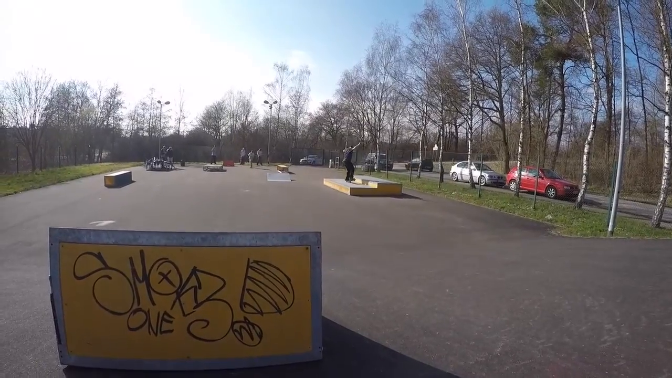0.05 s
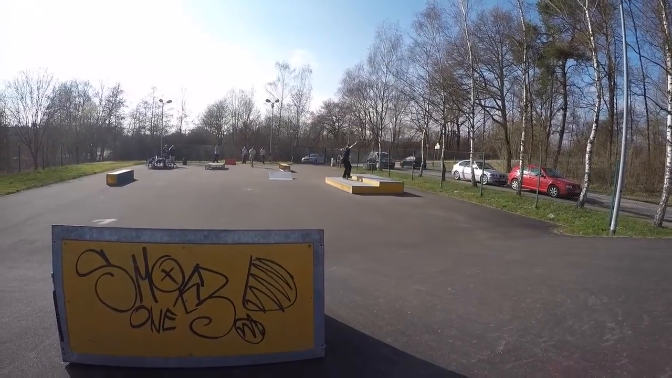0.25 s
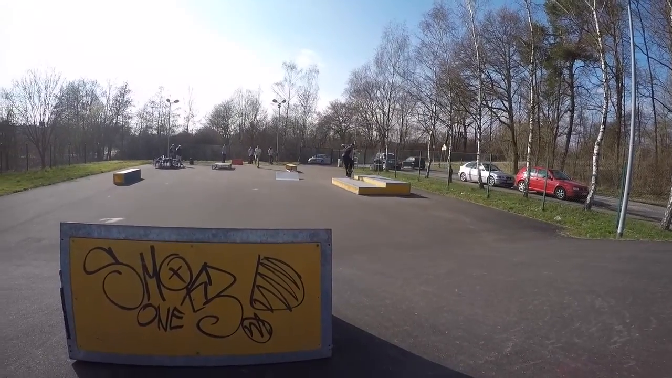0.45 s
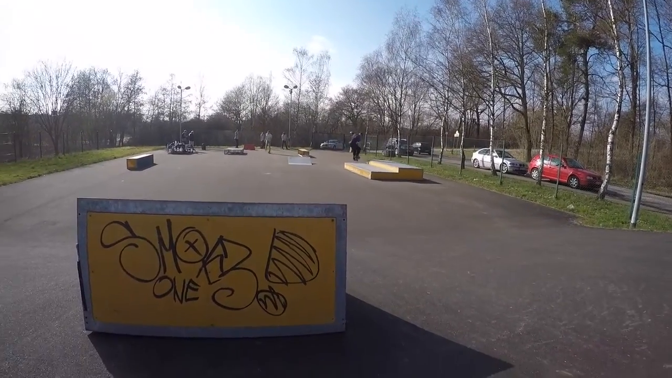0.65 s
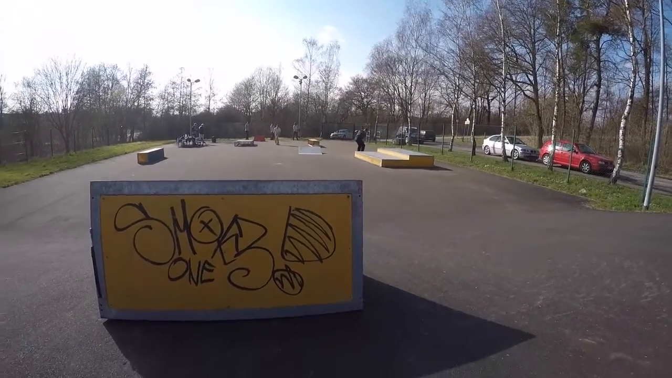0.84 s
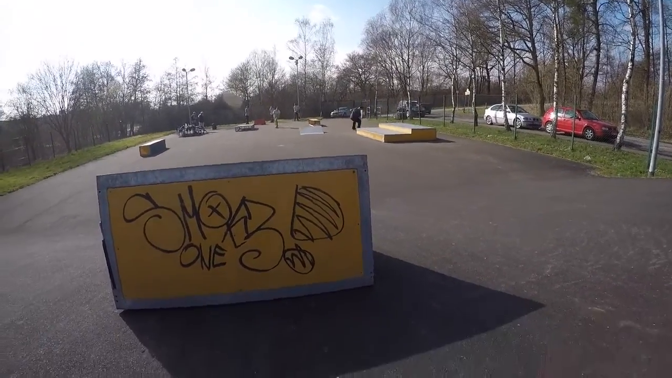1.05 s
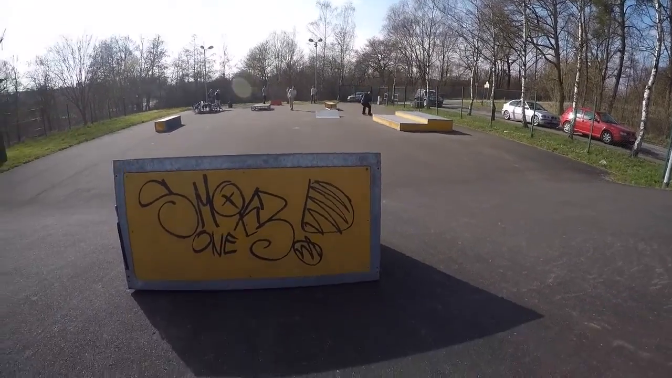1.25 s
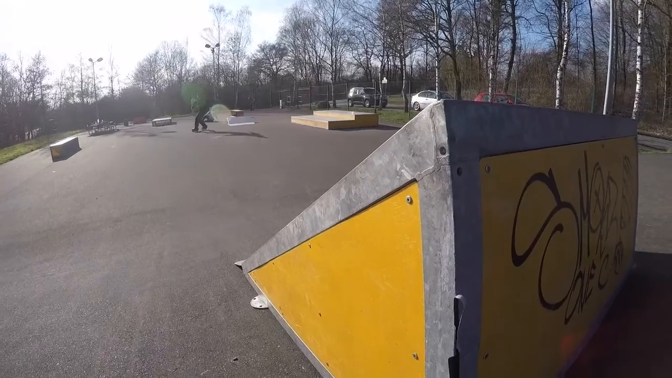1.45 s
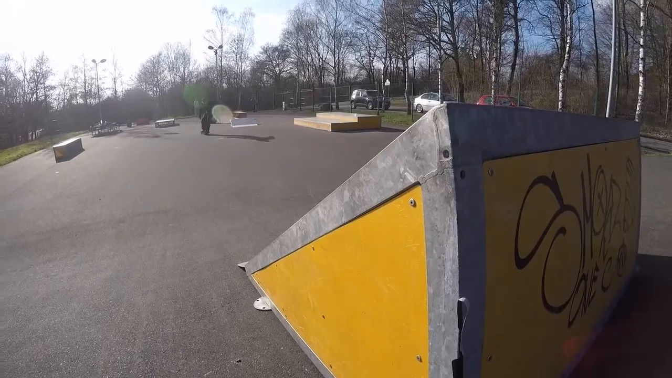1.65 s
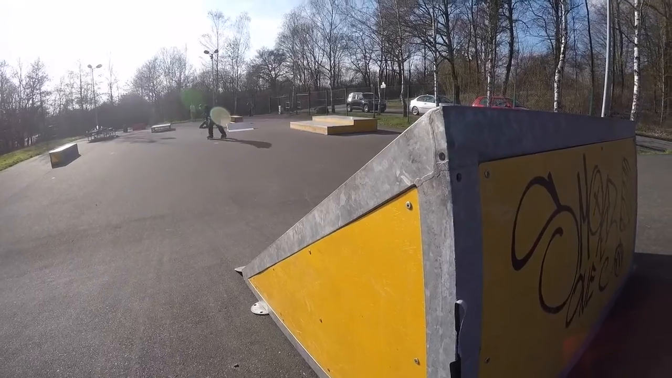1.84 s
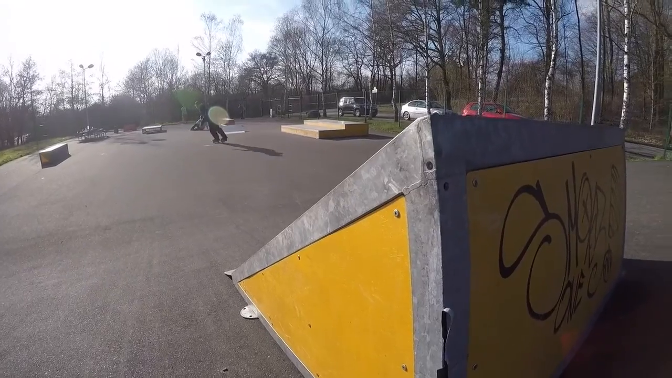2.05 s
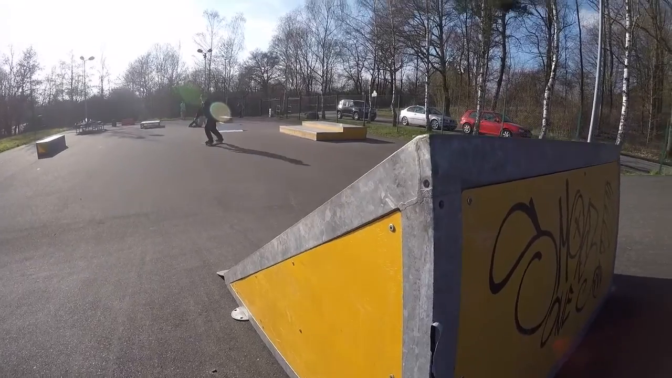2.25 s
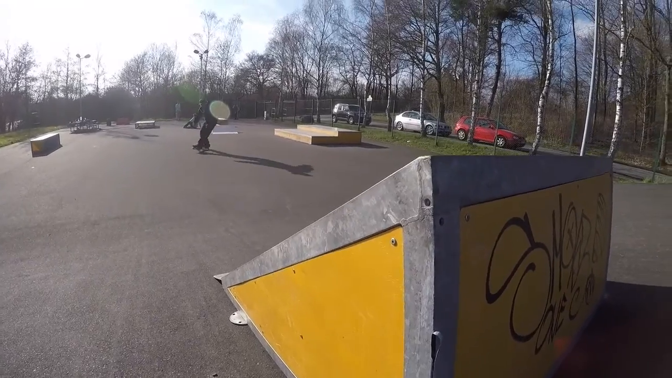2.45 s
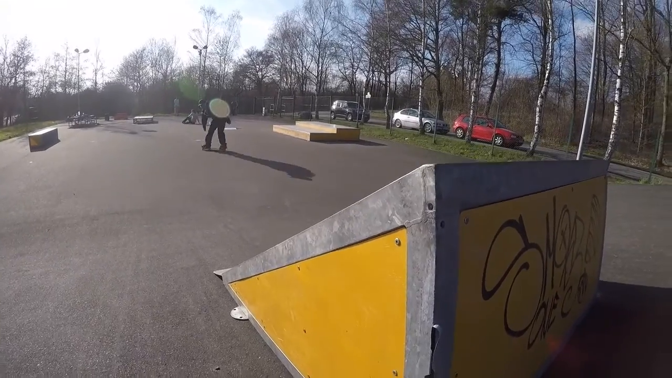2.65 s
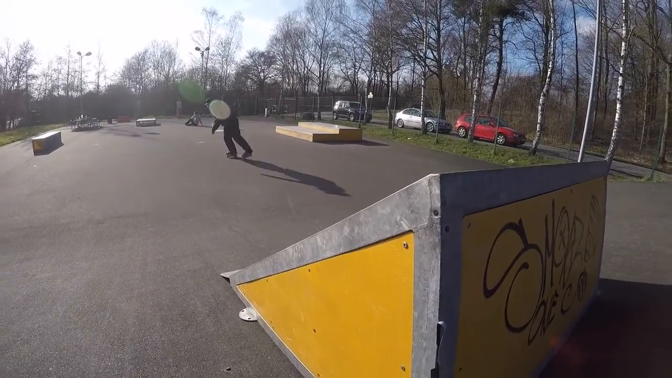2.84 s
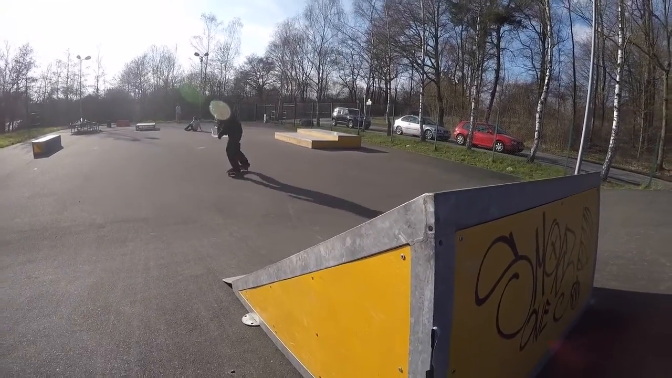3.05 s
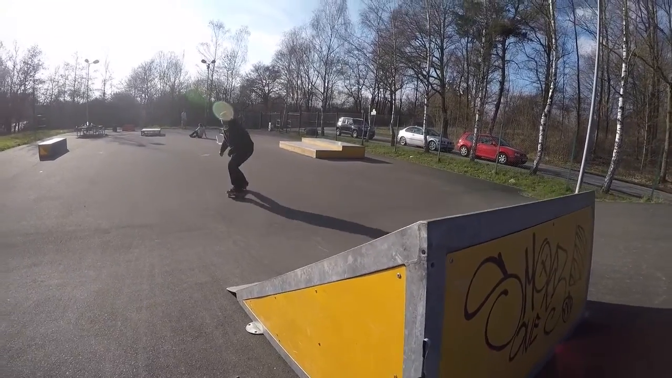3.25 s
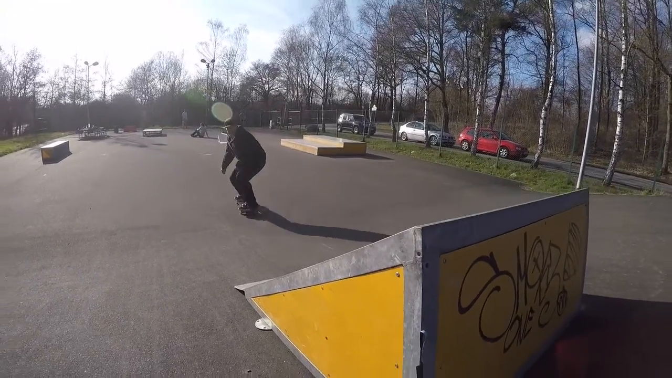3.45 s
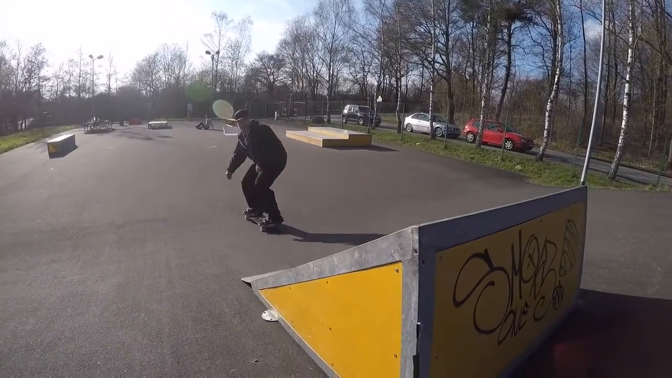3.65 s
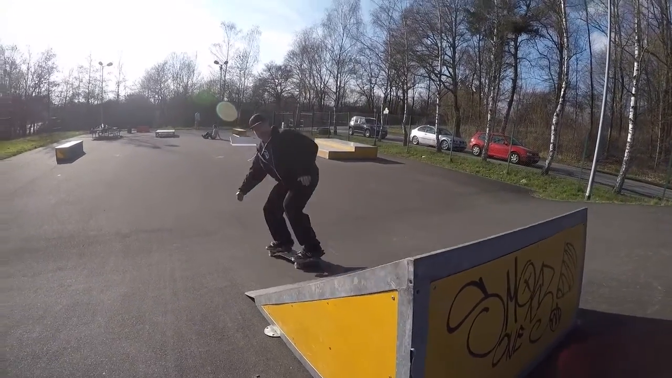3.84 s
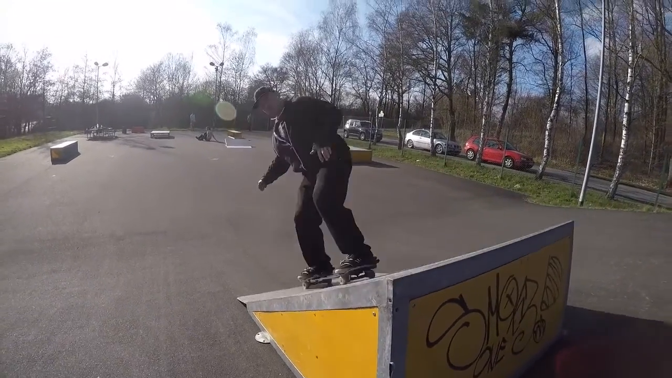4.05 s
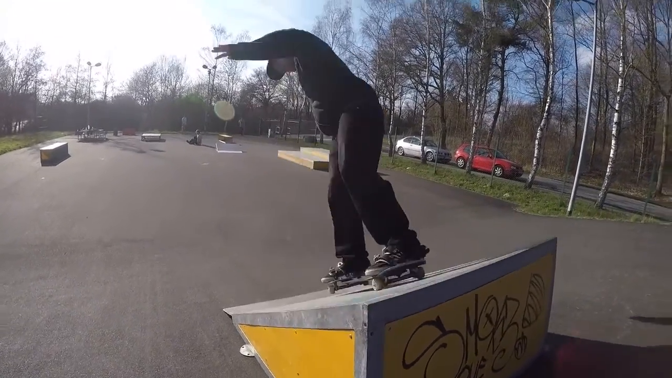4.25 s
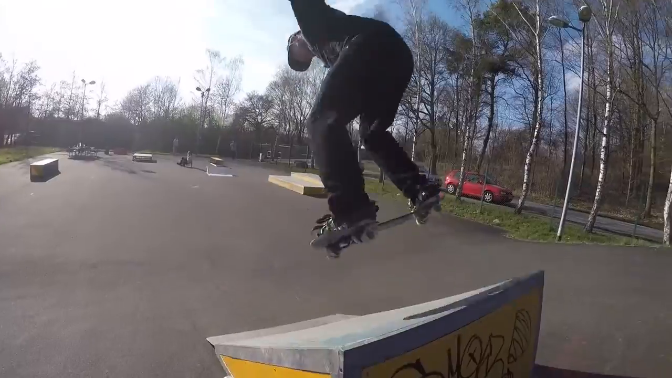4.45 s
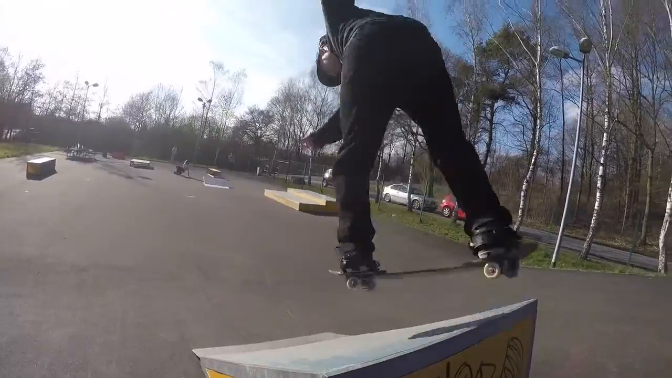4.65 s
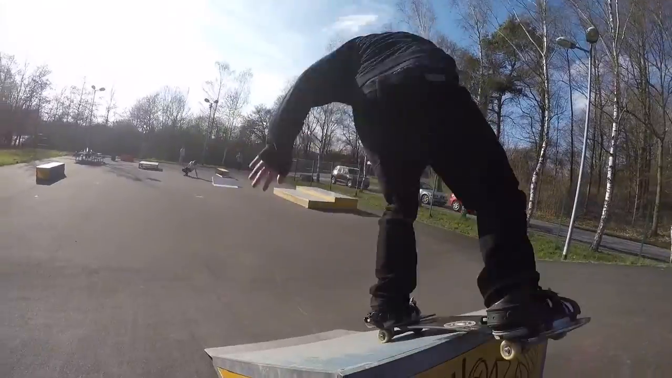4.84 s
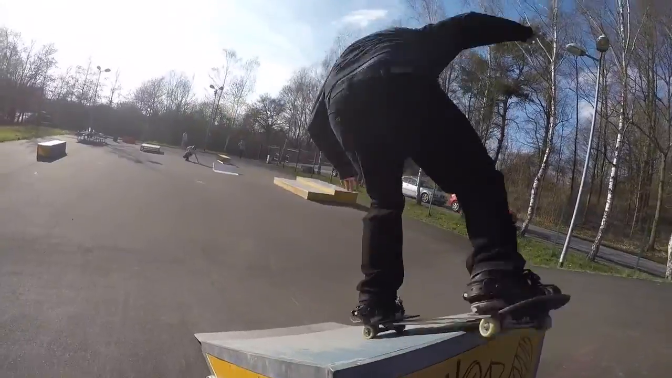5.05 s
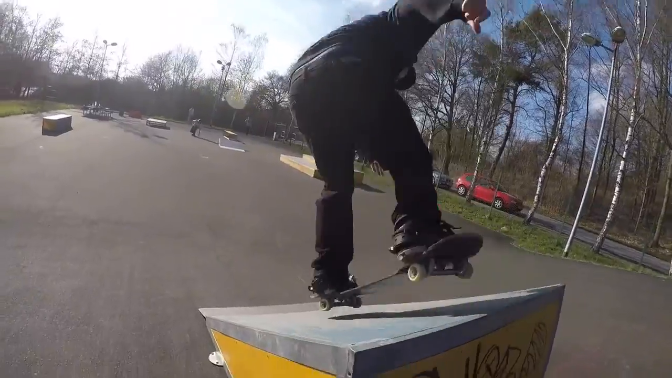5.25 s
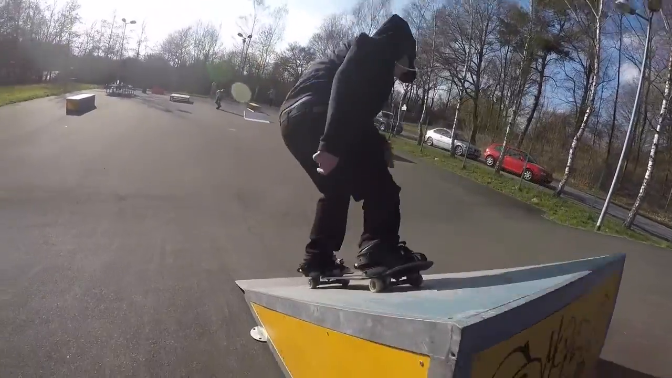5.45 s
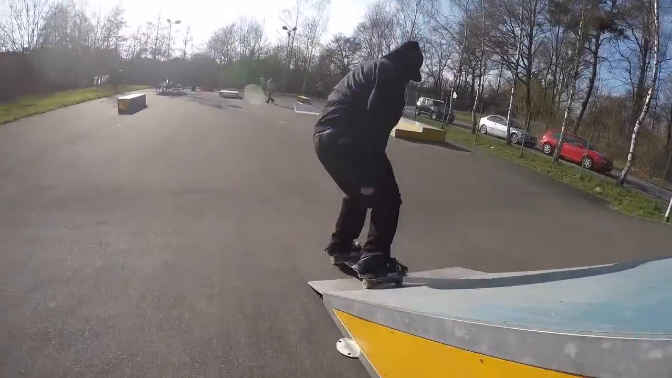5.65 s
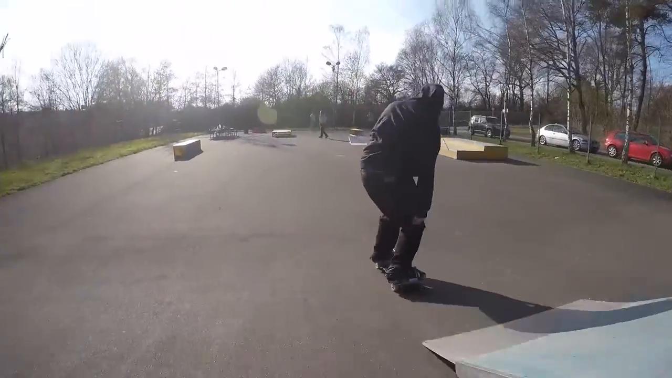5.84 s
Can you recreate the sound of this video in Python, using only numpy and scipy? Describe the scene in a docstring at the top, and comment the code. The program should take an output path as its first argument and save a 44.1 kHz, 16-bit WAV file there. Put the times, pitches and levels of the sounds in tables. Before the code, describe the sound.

A skateboard rolls closer over rough asphalt, slams onto a hollow steel-edged ramp, pauses, bangs twice more, and rumbles away.

```python
"""At a hollow steel-edged ramp, a skateboard rolls up over rough asphalt, slams on, stalls, drops back and rolls off.
Random grit excites resonances of wheels and wooden deck, also in the slams' fading tails; stones tick as noise bursts.
Slams and slower swells of clatter are decaying noise with ringing steel, deck and air modes.
A far board scrapes (noise bands gliding upward) and pops (struck modes); far boards make a smooth wash.
Lumpy low noise is wind on the microphone, at the end the board's low rumble; single pressure puffs join it."""
import sys
import numpy as np
from scipy import signal
from scipy.io import wavfile

SR = 44100
rng = np.random.default_rng(int(sys.argv[2]) if len(sys.argv) > 2 else 0)


def dump(signal):
    """Clip the signal to [-1, 1] and save it as 16-bit WAV at the path in sys.argv[1]."""
    limited = np.clip(np.atleast_2d(signal).T, -1, 1)
    pcm = np.round(limited * 32767).astype(np.int16)
    wavfile.write(sys.argv[1], SR, pcm)


N = 260631


def from_db(db):
    """Amplitude gain is ten to the power of a twentieth of the level in decibels."""
    return 10 ** (np.asarray(db) / 20)


def rms_one(x):
    """Normalization: dividing by the root mean square brings the signal to rms 1."""
    return x / np.sqrt(np.mean(x ** 2) + 1e-20)


def in_time(rows):
    """Linear interpolation turns the breakpoints of each column into a curve over all samples."""
    s, *columns = np.transpose(rows)
    return [np.interp(np.arange(N) / SR, s, column) for column in columns]


def at_hz(points, hz):
    """Interpolation on a log-frequency axis reads a spectrum between its points."""
    frequencies, values = np.transpose(points)
    return np.interp(np.log(hz), np.log(frequencies), values)


def drift(rate_hz):
    """Low-passed noise of rms 1: a random fluctuation, computed at every 40th sample."""
    r = np.exp(-2 * np.pi * rate_hz * 40 / SR)
    noise = rng.standard_normal(N // 40 + 2002)
    slow = signal.lfilter([1], [1, -2 * r, r * r], noise)[2000:]   # without the filter's onset
    return np.interp(np.arange(N) / 40, np.arange(len(slow)), rms_one(slow))


def ring(x, hz, t60):
    """Free vibration: a unit click starts a sine of height 1 that falls 60 dB in t60 seconds."""
    r = from_db(-60 / (t60 * SR))
    w = 2 * np.pi * hz / SR
    return signal.lfilter([0, np.sin(w)], [1, -2 * r * np.cos(w), r * r], x + 1e-18)


def resonate(x, hz, width_hz):
    """Forced vibration: a damped two-pole resonance passes its own frequency with gain 1."""
    r = np.exp(-np.pi * width_hz / SR)
    poles = [1, -2 * r * np.cos(2 * np.pi * hz / SR), r * r]
    return signal.lfilter([(1 - r * r) / 2, 0, (r * r - 1) / 2], poles, x)


def resonances(x, modes, waver_db):
    """Modal superposition: parallel resonances of alternating sign, each wavering in level; rms 1."""
    total = 0
    for k, (hz, width_hz, db) in enumerate(modes):
        gain = (-1) ** k * from_db(db + waver_db * drift(3.7))
        total = total + gain * resonate(x, hz, width_hz)
    return rms_one(total)


def steep(x, hz, kind):
    """Fourth-order Butterworth filter: flat passband, then 24 dB per octave."""
    return signal.sosfilt(signal.butter(4, hz, kind, fs=SR, output="sos"), x)


def bands(low_hz, count):
    """Third-octave bands of noise with equal power per Hz, each with its centre frequency."""
    white = rng.standard_normal((2, N))   # neighbouring bands use different noise
    edges = low_hz * 2 ** (np.arange(count + 1) / 3)
    for k in range(count):
        sos = signal.butter(2, edges[k:k + 2], "band", fs=SR, output="sos")
        yield np.sqrt(edges[k] * edges[k + 1]), signal.sosfilt(sos, white[k % 2])


def grit(per_s, spread_db):
    """Random impulse train: stones of uneven size and either sign pass under the wheels."""
    sizes = from_db(spread_db * np.minimum(rng.exponential(1, N), 5)) * rng.choice([-1, 1], N)
    return sizes * (rng.random(N) < per_s / SR)


def dying(at_s, level_db, t60, rise_s):
    """Exponential decay after a linear rise; overlapping events add in power."""
    power = np.zeros(N)
    for s, db, t, rise in np.broadcast(at_s, level_db, t60, rise_s):
        i = round(s * SR)
        age = np.arange(min(N - i, int((1.5 * t + rise) * SR))) / SR
        decay = from_db(db - 60 * np.maximum(age - rise, 0) / t)
        power[i:i + len(age)] += (np.minimum(age / rise, 1) * decay) ** 2
    return np.sqrt(power)


def struck(modes, at_s, level_db, soft_hz):
    """Modal impact: each click gives every mode a strength of its own; soft contact dulls the treble."""
    out = np.zeros(N)
    at = np.round(at_s * SR).astype(int)
    spread = rng.standard_normal((len(at), len(modes)))
    for k, (hz, db, t60) in enumerate(modes):
        clicks = np.zeros(N)
        clicks[at] = from_db(level_db + db + 2 * spread[:, k]) * (-1) ** k
        out += ring(clicks, hz, t60)
    return signal.sosfilt(signal.butter(1, soft_hz, fs=SR, output="sos"), out)


def low_noise():
    """Band-shaped random noise: lumpy wind, at the end the board's low rumble, and single pressure puffs."""
    # Level of low noise: wind gusts, and from 5.6 s the low rumble of the board rolling off.
    # Each row: time in seconds, level in dB.
    low_course = [(0.0, -30.5), (0.26, -33), (0.64, -30), (0.91, -30), (1.07, -34.5), (1.33, -30.5),
                  (1.46, -23.5), (1.71, -24.5), (1.92, -19), (2.26, -28), (2.81, -26.5), (2.96, -31.5),
                  (3.21, -24), (3.36, -26.5), (3.77, -18.5), (4.1, -13), (4.36, -24), (4.72, -23.5),
                  (4.89, -26.5), (5.3, -27), (5.48, -40.5), (5.68, -17), (5.84, -27), (5.91, -22)]
    # Spectrum of the low noise. Each row: frequency in Hz, relative density in dB per Hz.
    low_spectrum = [(8.8, -31), (15, -8), (32, 1), (49, -3), (73, -8.5), (157, -26.5), (199, -32),
                    (400, -31), (520, -51), (880, -120)]
    # Pressure puffs on the microphone. Each row: centre in seconds, peak level in dB, length in seconds.
    puffs = [(1.342, -20.5, 0.0055), (1.732, -5.5, 0.0085), (3.45, -8, 0.0052), (3.749, -5, 0.012),
             (4.738, -4.5, 0.0089), (5.293, -9, 0.0061)]
    lumps_db, lumps_hz = 2.5, 11   # spread and rate of the lumps

    noise = sum(from_db(at_hz(low_spectrum, hz) + 2.3 * drift(3.16)) * band
                for hz, band in bands(16.04, count=13))
    out = from_db(in_time(low_course)[0] + lumps_db * drift(lumps_hz)) * rms_one(noise)
    t = np.arange(N) / SR
    for s, db, length in puffs:
        u = (t - s) / (length / 2)
        out -= from_db(db) * (1 - u ** 2 / 2) * np.exp(-u ** 2 / 2)   # a dip between two small swells
    return out


def park():
    """Incoherent sum of far boards: a smooth wash of noise with a fixed mean spectrum."""
    # Spectrum of the wash. Each row: frequency in Hz, relative density in dB per Hz.
    park_spectrum = [(290, -30), (500, -31), (660, -9), (2080, -15), (2780, 7.5), (4410, -2), (4800, 2),
                     (6730, -8), (9000, -18), (11700, -63), (19800, -120)]
    wash = sum(from_db(at_hz(park_spectrum, hz) + drift(2.8)) * band for hz, band in bands(505, count=13))
    return from_db(-63) * rms_one(wash)


def rolling():
    """Random excitation of resonances: grit drives rumble, deck, wheels and bearings; bumps shake all."""
    # Rolling noise: the board nears and climbs, slam tails fade after 4.2 s, then it rolls off.
    # Each row: time in seconds, deck level in dB, wheel grit level in dB.
    roll_course = [(0.0, -38, -48), (0.25, -43.5, -52), (0.56, -47, -50), (0.85, -48, -46),
                   (1.05, -39.5, -46.5), (1.33, -53.5, -51), (1.34, -44, -52.5), (1.5, -41, -48.5),
                   (1.81, -44, -48.5), (1.94, -40, -45), (2.18, -43.5, -50.5), (2.4, -33.5, -44),
                   (2.62, -39.5, -44), (2.75, -36, -40), (3.03, -38.5, -44.5), (3.13, -31.5, -44),
                   (3.4, -27, -43.5), (3.84, -28.5, -38.5), (4.2, -28.5, -40.5), (4.3, -49, -57),
                   (4.74, -53, -55.5), (4.9, -31.5, -40), (5.12, -53, -55), (5.33, -50.5, -64),
                   (5.45, -39, -41.5), (5.52, -40, -49.5), (5.56, -38, -44), (5.575, -17.5, -48),
                   (5.66, -26, -32.5), (5.69, -18, -33), (5.82, -30, -34.5), (5.91, -24.5, -33.5)]
    # Resonances of the rumble, deck, wheels and bearings.
    # Each row: frequency in Hz, bandwidth in Hz, relative level in dB.
    rumble_modes = [(101, 54, -5), (138, 84, -4.5), (180, 23, -2.5), (206.4, 37, -5.5), (257, 120, -8)]
    deck_modes = [(315, 44, -1.5), (326.4, 21, 3), (358.6, 34.4, -0.5), (423.3, 20, -1.5),
                  (443.3, 24.3, -1.5), (496, 86, -3.5), (517, 73, -5.5), (645, 250, -17.5)]
    wheel_modes = [(702, 280, -2.5), (1062, 206, 4), (1350, 210, 0.5), (1753, 230, 0), (2310, 250, -1.5),
                   (2730, 450, -3.5), (3370, 260, -6.5), (3900, 960, -10), (4430, 540, -16.5)]
    bearing_modes = [(5290, 630, 0), (6600, 730, -4.5), (7200, 520, -5.5), (8400, 460, -10.5),
                     (9270, 740, -13), (10390, 290, -9), (11200, 750, -12.5), (13300, 800, -11.5),
                     (15100, 1100, -17)]
    ramp_s = 4.17   # from here on the hollow ramp's settings hold
    hiss_asphalt_db, hiss_ramp_db = -14.5, -19.5   # bearing hiss against wheel grit
    near_start_s, near_end_s, near_db = 3.0, 3.95, 4   # the hiss brightens as the board comes close
    swell_start_s, swell_end_s, swell_top_db = 1.12, 1.335, -54   # the hiss swells and stops short

    deck_db, grit_db = in_time(roll_course)
    t = np.arange(N) / SR
    on_ramp = t > ramp_s
    # rumble follows about half of the deck's swing and gains 6 dB with the ramp's settings
    rumble_db = -43.5 + 0.53 * (deck_db + 44) + 6 * on_ramp
    nearing_db = np.interp(t, [near_start_s, near_end_s], [0, near_db])
    hiss_gain = from_db(grit_db + np.where(on_ramp, hiss_ramp_db, hiss_asphalt_db + nearing_db))
    swell = np.clip((t - swell_start_s) / (swell_end_s - swell_start_s), 0, 1) * (t < swell_end_s)
    hiss_gain = hiss_gain + from_db(swell_top_db) * swell

    bumps_db = drift(18.0)
    coarse, fine = grit(900, 1.87), grit(6000, 1.8)
    rumble = resonances(steep(coarse, 300, "low"), rumble_modes, waver_db=5.5)
    deck = resonances(steep(steep(coarse, 680, "low"), 264, "high"), deck_modes, waver_db=1.8)
    wheels = resonances(steep(fine, 5000, "low"), wheel_modes, waver_db=1.5)
    hiss = resonances(steep(grit(6500, 2.1), 3200, "high"), bearing_modes, waver_db=1.5)
    return from_db(bumps_db) * (from_db(rumble_db) * rumble + from_db(deck_db) * deck
                                + from_db(grit_db) * wheels + hiss_gain * hiss)


def ticks():
    """Impulsive contact: each stone is a dry noise burst with a broad resonance and some open treble."""
    # Stones under the wheels.
    # Each row: start in seconds, level in dB, pitch in Hz, treble level against the body in dB.
    stone_rows = [(0.5165, -38, 2080, -22), (0.527, -40.5, 2820, -13), (0.8005, -34, 3100, -8),
                  (0.8098, -31, 3680, -15.5), (1.2056, -34, 3800, -15), (1.5602, -29, 1620, -16),
                  (1.7352, -28, 2230, -20), (1.838, -33.5, 2340, -11), (2.08, -35, 2900, -9),
                  (2.227, -20.5, 2000, -13.5), (2.283, -32, 2370, -11), (2.4097, -28, 2170, -23),
                  (2.4399, -26.5, 1720, -7.5), (2.5283, -32, 2840, -13), (2.592, -27, 1850, -16),
                  (2.7084, -31.5, 1660, -6), (2.97, -33, 2520, -20), (2.8537, -27, 2440, -23),
                  (3.0273, -16, 2500, -12.5), (3.0444, -27, 3040, -12), (3.061, -29.5, 2550, -10),
                  (4.3982, -37.5, 2420, -28), (5.5435, -41, 2670, -7)]
    first_s, last_s = 1.4, 3.0   # small stones at random times while the board nears
    t60 = 0.038   # seconds

    u = rng.random((14, 4))
    pebbles = np.c_[first_s + (last_s - first_s) * u[:, 0], -44 + 6 * u[:, 1],
                    1700 + 1200 * u[:, 2], -22 + 14 * u[:, 3]]
    stones = np.r_[stone_rows, pebbles]
    out = np.zeros(N)
    chance = rng.standard_normal((len(stones), 1500))
    treble_band = signal.butter(2, [4500, 12000], "band", fs=SR, output="sos")
    for (s, db, hz, treble_db), draw in zip(stones, chance):
        i = round(s * SR)
        kick = draw * from_db(-60 * np.arange(len(draw)) / (t60 * SR))
        body = resonate(kick, hz, 0.17 * hz)
        # subtracted broad resonances reshape the skirts above and below the pitch
        body = body - 0.35 * resonate(kick, 1.4 * hz, 0.5 * hz) - 0.31 * resonate(kick, 0.5 * hz, 0.52 * hz)
        treble = signal.sosfilt(treble_band, kick)
        sound = body / np.abs(body).max() + from_db(treble_db) * treble / np.abs(treble).max()
        out[i:i + len(draw)] += from_db(db) * sound
    return steep(out, 1200, "high")


def scrape():
    """Amplitude modulation: slow noise on gliding carriers gives rising bands as a far board slides."""
    # Bands of the scrape. Each row: ratio to the gliding pitch, bandwidth in Hz, relative level in dB.
    scrape_bands = [(.26, 500, -7.5), (0.449, 600, -7.5), (0.639, 281, -3), (.8, 453, -5.5), (.92, 200, -9),
                    (0.998, 223, 0.5), (1.361, 200, -10), (1.549, 600, -12.5), (2.3, 2520, -28.5)]
    start_s, full_s, end_s, hold_s = 0.52, 0.659, 0.865, 0.041
    full_db, rise_db_per_s, fall_db_per_s = -36.5, 156, 82
    from_hz, to_hz = 2900, 3800
    glide_late_s, glide_s = 0.01003, 0.08   # middle of the glide after full level, its half length

    start, end = round(start_s * SR), round(end_s * SR)
    late = np.arange(start, end) / SR - full_s
    fall_db = -fall_db_per_s * np.maximum(late - hold_s, 0)
    level_db = full_db + np.minimum(rise_db_per_s * late, fall_db)
    glide = 0.5 + 0.5 * np.tanh((late - glide_late_s) / glide_s)
    turns = np.cumsum(from_hz + (to_hz - from_hz) * glide) / SR
    sound = 0
    for ratio, width_hz, db in scrape_bands:
        low_pass = signal.butter(2, width_hz / 2, fs=SR)
        slow = signal.lfilter(*low_pass, rng.standard_normal((2, end - start)))
        phase = 2 * np.pi * ratio * turns
        sound = sound + from_db(db) * (slow[0] * np.cos(phase) + slow[1] * np.sin(phase))
    rough = rms_one(sound * from_db(2.0 * drift(60.0))[start:end])
    out = np.zeros(N)
    out[start:end] = rough * signal.windows.tukey(end - start, 0.15) * from_db(level_db)
    return out


def slams():
    """Impact and modal decay: trucks and bearings clatter or swell, steel rings, deck knocks, ramp booms."""
    # Board hits, and slower swells of clatter. Each row: start in seconds,
    # clatter level in dB (8 dB above that used at 3 kHz), rise in seconds, clatter t60 in seconds,
    # tilt in dB per octave, then knock, boom and tail level in dB.
    slam_rows = [(0.867, -18, 0.0011, 0.057, -3.5, -46, -24, -33.5),
                 (0.906, -27, 0.0056, 0.068, 3.5, -29.5, -30, -40.5),
                 (0.936, -28.5, 0.0042, 0.04, -3, -33, -36, -38.5),
                 (0.983, -33, 0.0071, 0.02, 1, -52, -27.5, -42),
                 (3.961, -4, 0.0023, 0.15, 6, -7.5, -10, -25),
                 (3.971, -6, 0.0056, 0.069, -0.5, -6, -9.5, -22.5),
                 (4.065, -10, 0.0059, 0.065, -0.5, -15, -12.5, -50),
                 (4.071, -13.5, 0.0048, 0.14, 8, -14.5, -32, -20.5),
                 (4.752, -1.5, 0.0043, 0.034, 1, -51, -2.5, -34),
                 (4.769, 5, 0.0015, 0.044, 0.7, -16.5, -17, -38),
                 (4.788, -32, 0.0039, 0.093, 10, -6.5, -3.5, -24.5),
                 (4.838, -24.5, 0.028, 0.21, 2.5, -27.5, -32, -40),
                 (5.339, -27, 0.00306, .05, -3, -25, -5, -57),
                 (5.347, -1.5, 0.0017, 0.068, -3, -3.5, 1.5, -55),
                 (5.364, -17.5, 0.0072, 0.19, -5, -20, -7, -41),
                 (5.38, -37, .012, 0.16, 15, -21, -10.5, -55),
                 (5.568, -34.5, 0.0015, 1, -3, -29, -34, -31.5),
                 (5.68, -17, .02, 0.14, 4.5, -19.5, -20, -25.5), (5.775, -23, .01, 0.27, 0, -23, -22, -40)]
    # Clatter spectrum. Each row: frequency in Hz, relative density in dB per Hz.
    clatter_spectrum = [(290, -19.5), (500, -2.5), (1020, -3.5), (1320, -8), (1790, -3.5), (2130, -14.5),
                        (2390, -2), (3860, -3.5), (9770, -31.5), (14700, -45.5), (16000, -54)]
    # Decay of the tail. Each row: frequency in Hz, t60 in seconds.
    tail_decay = [(300, 0.79), (1000, 0.42), (3000, 0.51), (6000, 0.44), (12000, 0.085)]
    # Modes of coping and trucks, of deck and ramp panels, and of the air in the hollow ramp.
    # Each row: frequency in Hz, relative level in dB, t60 in seconds.
    steel_modes = [(2390, -6, 0.09), (2560, -11.5, .12), (2730, -6, 0.031), (2960, -2, .08),
                   (3380, -7.5, 0.027), (3600, -26, 0.043), (4050, -17, 0.059), (4700, -31, 0.072),
                   (5420, -11.5, 0.08), (6000, 0.5, 0.056)]
    knock_modes = [(172.8, -1.5, 0.12), (233, -4.5, 0.063), (321.3, -5.5, 0.11), (370, -45, 1.9),
                   (396.5, 1.5, 0.045), (414, -16, .6), (434.4, -10.5, 0.14), (494, -4, 0.047),
                   (540, -18.5, 0.26), (790, -27, 0.077), (1024, -11, 0.069)]
    boom_modes = [(49.7, -3, 0.17), (63.3, -1.5, 0.15), (87.5, -3, 0.16), (115, -3, 0.12)]

    s, clatter_db, rise_s, t60, tilt_db, knock_db, boom_db, tail_db = np.transpose(slam_rows)
    rattle = from_db(3 * drift(90.0))
    noise = list(bands(385, count=16))
    whole = sum(from_db(at_hz(clatter_spectrum, hz)) * band for hz, band in noise)
    scale = np.sqrt(np.mean(whole ** 2))
    clatter = 0
    for hz, band in noise:
        burst = dying(s, clatter_db - 8 + tilt_db * np.log2(hz / 3000), t60, rise_s)
        tail = dying(s, tail_db, at_hz(tail_decay, hz), rise_s) * from_db(1.6 * drift(25.0))
        shaped = from_db(at_hz(clatter_spectrum, hz)) / scale * band
        clatter = clatter + shaped * (burst * rattle + tail)
    # the clatter shakes the metal
    steel = from_db(-41.5) * sum(from_db(db) * ring(clatter, hz, t) for hz, db, t in steel_modes)
    knock = struck(knock_modes, s + rise_s, knock_db, 1300)
    boom = struck(boom_modes, s + rise_s, boom_db, 400)
    return clatter + steel + knock + boom


def pop():
    """Modal impact: the far board's tail hits the ground and its modes ring briefly."""
    # Modes of the far board. Each row: frequency in Hz, relative level in dB, t60 in seconds.
    pop_modes = [(146, -7.5, 0.12), (260, -4, 0.051), (402, 1, 0.058), (507, 2, 0.063), (726, -10, 0.025),
                 (3920, -5.5, 0.014)]
    return struck(pop_modes, np.array([0.8685]), -11, 5000)


def scene():
    """Linear superposition: the pressures of all sources add at one microphone."""
    return (low_noise() + park() + rolling() + ticks() + scrape() + slams() + pop())[None]


def record(dry):
    """Saturation and band limiting: the loudest hits overload smoothly, and the top is cut."""
    top = 0.88   # amplitude that the overload approaches
    clipped = dry / (1 + np.abs(dry / top) ** 6) ** (1 / 6)
    low_pass = signal.cheby2(16, 80, 16000, fs=SR, output="sos")   # 80 dB down from 16 kHz up
    return signal.sosfilt(low_pass, clipped)


dry = scene()
out = record(dry)
dump(out)
```